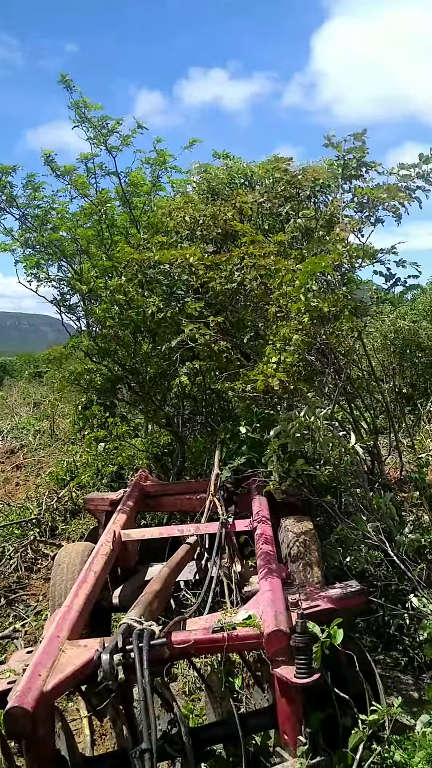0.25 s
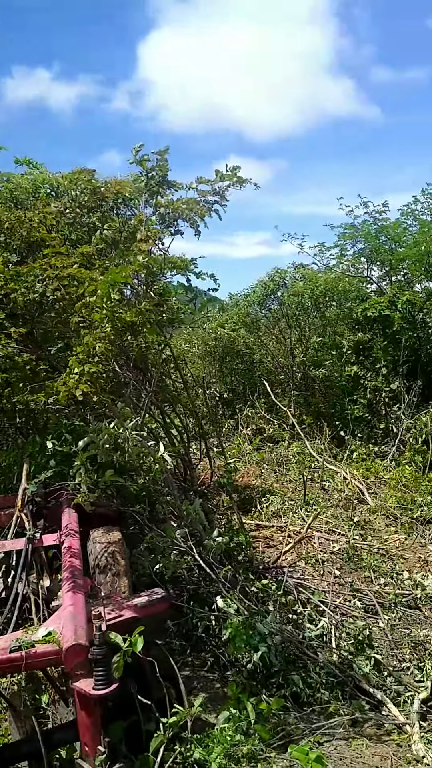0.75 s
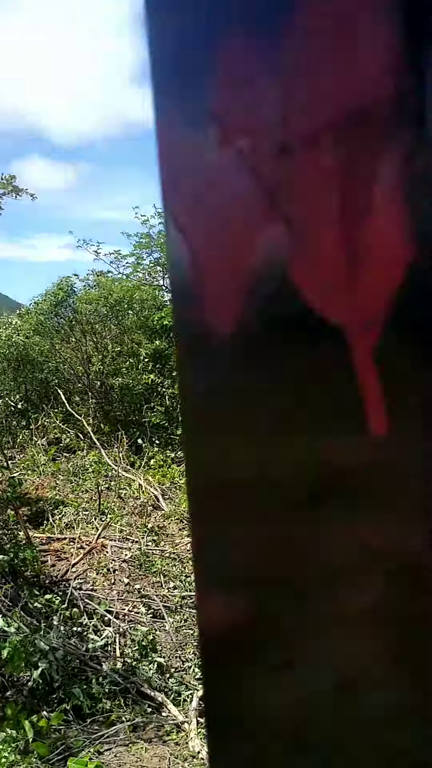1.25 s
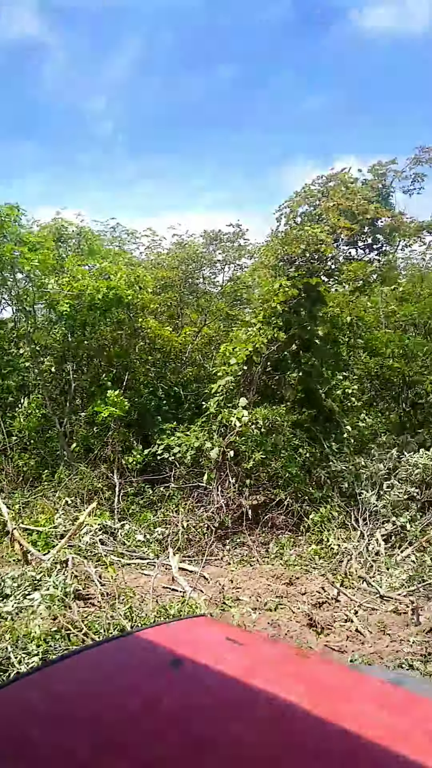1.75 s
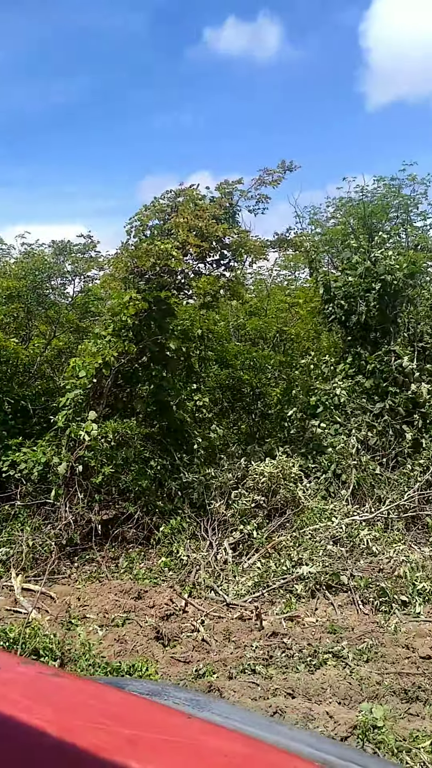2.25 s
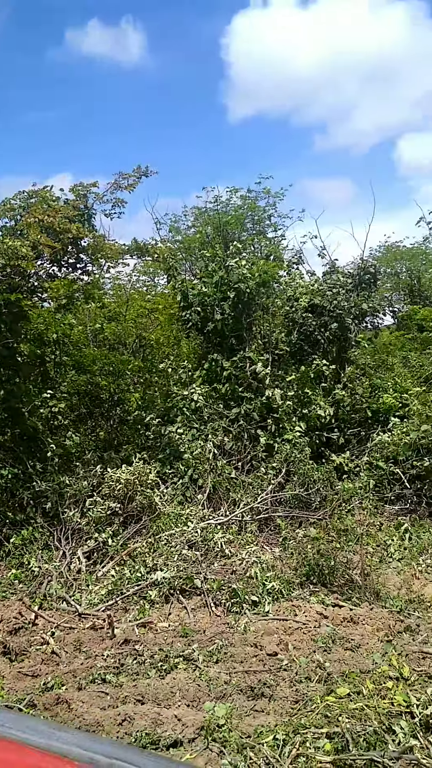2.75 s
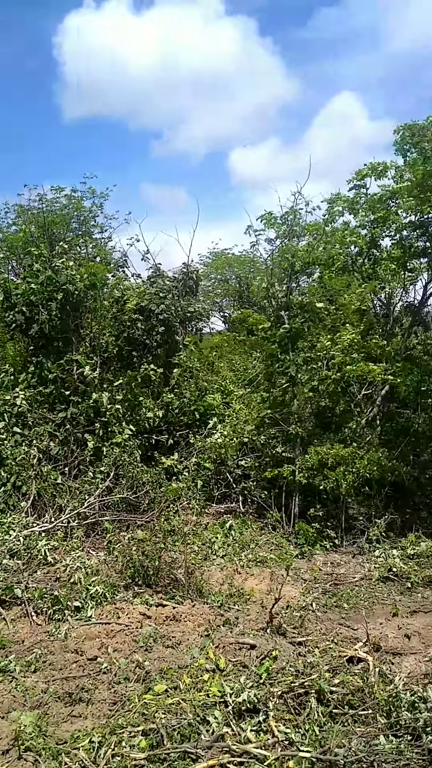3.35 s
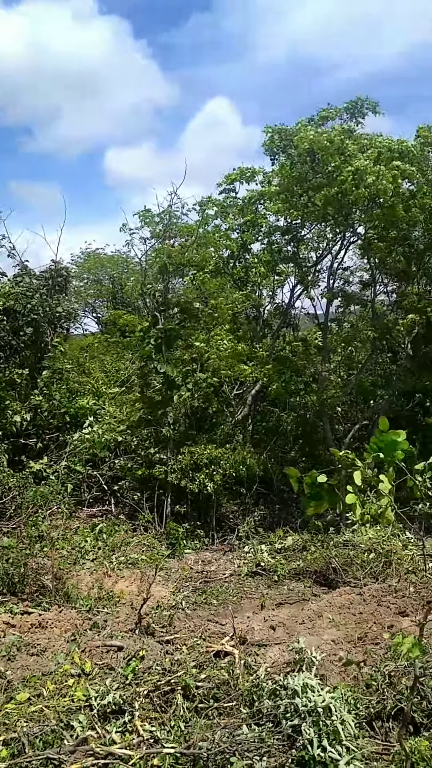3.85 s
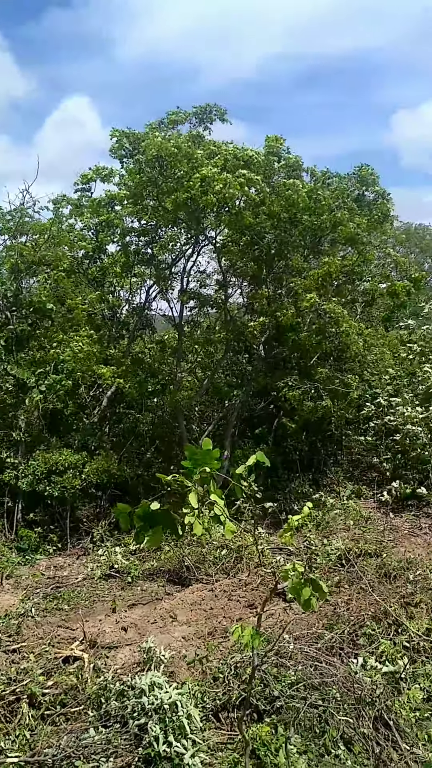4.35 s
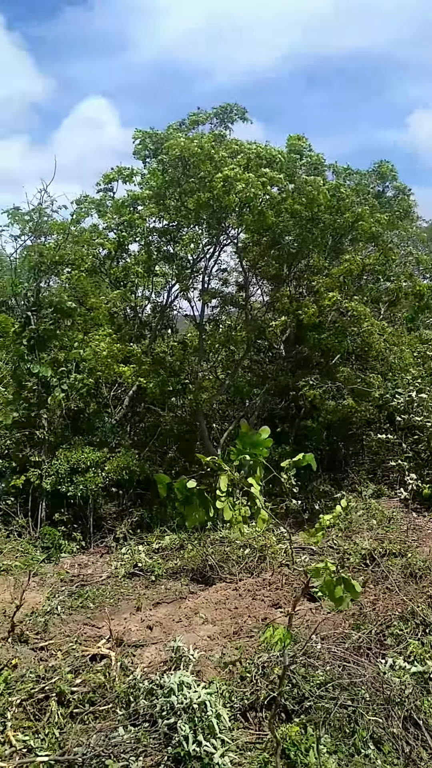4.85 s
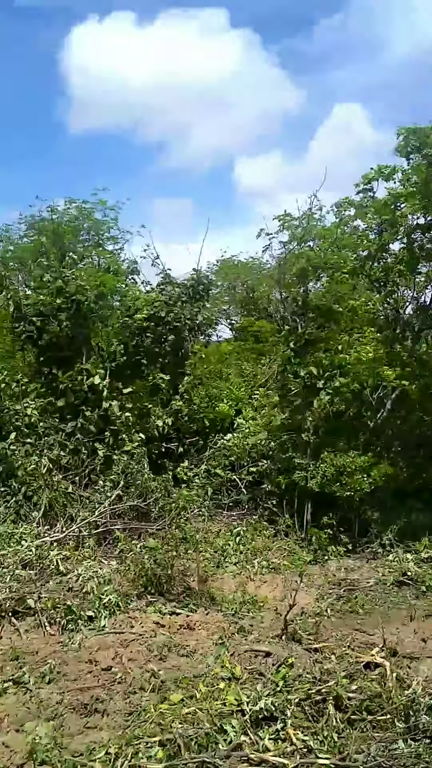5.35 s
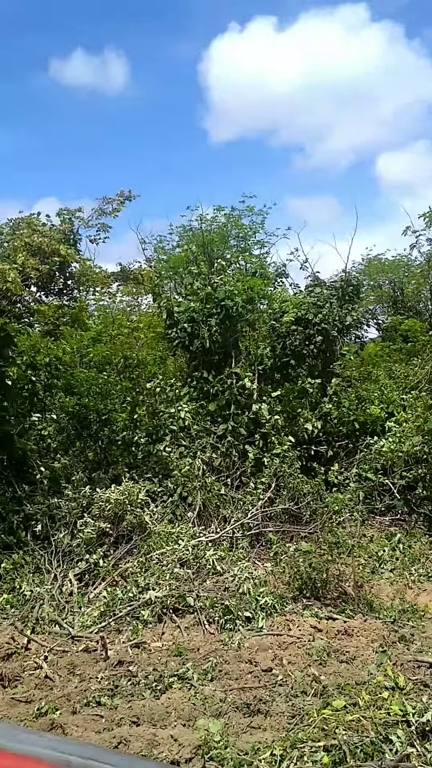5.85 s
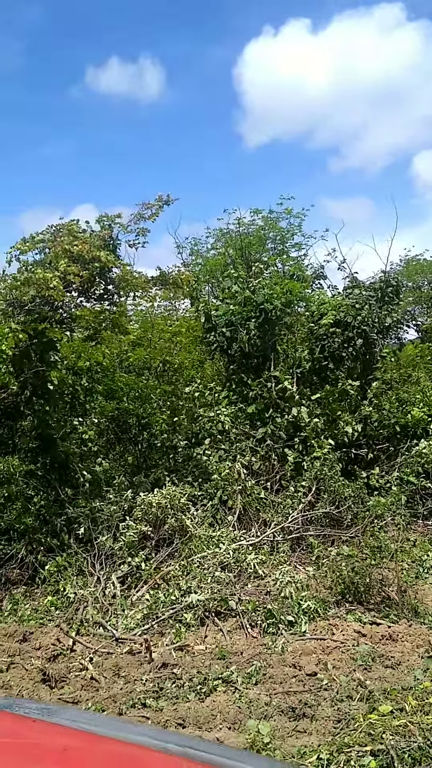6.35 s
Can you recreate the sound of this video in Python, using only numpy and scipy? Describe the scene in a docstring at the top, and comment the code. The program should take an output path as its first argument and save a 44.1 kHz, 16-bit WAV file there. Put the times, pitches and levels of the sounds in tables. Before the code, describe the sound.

A tractor diesel runs at a steady idle for about 6.6 seconds, heard close from the driver's seat outdoors on a hand-held stereo microphone. Its rapid uneven chug combines low exhaust thumps, dense metallic clatter, ringing knocks in the block and thin gear whines, the whine strongest early. From 0.5 s small bright metal ticks and light gusts come and go. From 1 s the right side gradually turns toward the engine, its mid-range knocking becoming clearer, and a booming tone strengthens around 2.4 s. Between 2.6 and 3.6 s wind bursts pop hard, first left, then on both sides, with short hollow rings and low flutter. A very high insect rasp clicks in fast pulses, clearest around 4.3 to 4.8 s. A weaker gust brushes the left near 5.9 s. At 6.4 s everything cuts to silence briefly, then the engine fades partway back until the end.

```python
"""A tractor diesel idles outdoors, heard from the driver's seat by a hand-held pair of microphones.
Throughout, crank-locked tones thump, contacts ring the block, gear tones whine and an insect clicks in noise.
From half a second bright pings and gusts come and go; from 1 s the hand turns the right port to the engine.
Around 2.6 to 3.6 s wind pops burst on the ports, pointed pushes that ring on; a weaker gust returns near 5.9 s.
At 6.4 s the sound is cut, then fades part of the way back in."""
import sys
import numpy as np
from scipy import signal
from scipy.io import wavfile
from scipy.ndimage import uniform_filter1d

SR = 44100
rng = np.random.default_rng(int(sys.argv[2]) if len(sys.argv) > 2 else 0)


def dump(signal):
    """Clip the signal to [-1, 1] and save it as 16-bit WAV at the path in sys.argv[1]."""
    limited = np.clip(np.atleast_2d(signal).T, -1, 1)
    pcm = np.round(limited * 32767).astype(np.int16)
    wavfile.write(sys.argv[1], SR, pcm)


N = 291060

# gusts that catch one port: start_s, hold_s, port (0 left, 1 right), buffet_db, flutter_db
GUST_ROWS = [(0.57, 0.096, 0, -25, -34), (1.475, 0.067, 0, -25, -57), (2.334, 0.16, 0, -25.5, -40),
             (2.655, 0.068, 0, -25, -34), (2.806, 0.04, 0, -25, -33), (2.847, 0.018, 1, -22.5, -40),
             (2.989, 0.016, 1, -20.5, -36), (2.973, 0.031, 0, -22, -44), (3.08, 0.043, 0, -19, -31),
             (3.082, 0.0088, 1, -23, -23), (3.16, 0.21, 1, -21, -26), (3.175, 0.032, 0, -19, -39),
             (3.308, 0.2, 0, -20, -38), (3.435, 0.018, 1, -22, -23.5), (3.585, 0.07, 1, -27, -30.5),
             (3.62, 0.079, 0, -30, -45), (5.89, 0.031, 0, -25, -45), (6.28, 0.032, 0, -28, -50)]
BRIGHT_ABOVE_HZ = 3000  # thin parts: they answer hard firings and vary more in pitch


def from_db(db):
    """Decibels to gain."""
    return 10 ** (np.asarray(db) / 20)


def rms_one(x):
    """Each channel scaled to rms 1."""
    return x / np.sqrt(np.mean(x ** 2, axis=-1, keepdims=True) + 1e-20)


def in_time(rows):
    """Columns of a curve whose first column is seconds, read sample by sample."""
    s, *columns = np.transpose(rows)
    return [np.interp(np.arange(N) / SR, s, column) for column in columns]


def at_hz(points, hz):
    """A spectrum read on a log-frequency axis."""
    point_hz, values = np.transpose(points)
    return np.interp(np.log(hz), np.log(point_hz), values)


def drift(rate_hz):
    """Slow chance of spread 1: noise through a two-pole low-pass, computed every 40 samples."""
    r = np.exp(-2 * np.pi * rate_hz * 40 / SR)
    noise = rng.standard_normal(N // 40 + 2002)
    slow = signal.lfilter([1], [1, -2 * r, r * r], noise)[2000:]  # drop the settling
    return np.interp(np.arange(N) / 40, np.arange(len(slow)), rms_one(slow))


def resonance(x, hz, width_hz):
    """One two-pole resonance."""
    r = np.exp(-np.pi * width_hz / SR)
    return signal.lfilter([1, 0, -1], [1, -2 * r * np.cos(2 * np.pi * hz / SR), r * r], x)


def crank():
    """Crank turns made at every sample: the running sum of its speed."""
    # crankshaft speed: start_s, speed_turns_per_s
    speed = [(0, 18.116), (.7, 18.091), (1.4, 17.892), (2.7, 18.069), (4.1, 18.031), (4.7, 18.135),
             (6.6, 18.002)]
    start_turn = -.413
    return start_turn + np.cumsum(in_time(speed)[0]) / SR


def exhaust(turns, wobble_db, wobble_rad):
    """Whole multiples dip once a turn, every fourth late; halves, from unequal cylinders, once a cycle."""
    # exhaust tones: multiple of crank speed, level_db (rms, before boom and wobble)
    tones = [(2.0, -70.0), (2.5, -57.0), (3.0, -35.0), (3.5, -50.0), (4.0, -35.5), (4.5, -50.0),
             (5.0, -34.5), (5.5, -41.0), (6.0, -34.5), (6.5, -55.0), (7.0, -38.0), (7.5, -40.0),
             (8.0, -40.0), (8.5, -36.0), (9.0, -44.0), (9.5, -49.0), (10.0, -42.0), (10.5, -42.0),
             (11.0, -44.0), (11.5, -47.0), (12.0, -47.0)]
    # the bonnet booms on one half multiple as the hand turns: start_s, boom_db over its exhaust row
    boom = [(0, -19), (2.0, -8), (2.4, 4.5), (3.0, 0), (4.2, 3), (5.6, -1.5), (6.0, 6), (6.42, 5),
            (6.47, -10), (6.6, -8)]
    boom_multiple = 8.5
    boom_db, = in_time(boom)
    out = np.zeros(N)
    for multiple, level_db in tones:
        if multiple % 1:
            dip_turn = 1.77
        elif multiple % 4:
            dip_turn = .96
        else:
            dip_turn = .995
        phase = 2 * np.pi * multiple * (turns - dip_turn)
        phase = phase + wobble_rad * np.sqrt(multiple) * drift(1.85)
        tone_db = level_db + boom_db * (multiple == boom_multiple) + wobble_db * drift(3.1)
        out -= np.sqrt(2) * from_db(tone_db) * np.cos(phase)
    return out


def harder(at, hz):
    """Extra dB for bright contacts that fall on a firing harder or softer than usual."""
    # marked firings: start_s, tick_peak_db (only its distance from the usual tick counts)
    firings = [(0.5661, -38.5), (1.6247, -39), (1.6781, -39), (1.736, -37), (1.7903, -39.5),
               (1.8472, -39.5), (1.9589, -38), (2.0143, -37.5), (2.1211, -40), (2.8464, -39), (3.1218, -38),
               (3.3428, -39), (3.6735, -41.5), (4.1165, -39.5), (4.559, -40.5), (4.8918, -39),
               (5.1123, -39.5), (5.9983, -40), (6.332, -39.5)]
    usual_tick_db, reach_s = -40, .014
    s, peak_db = np.transpose(firings)
    near = np.abs(np.asarray(at)[..., None] / SR - s) < reach_s
    return (near * (peak_db - usual_tick_db)).sum(axis=-1) * (hz > BRIGHT_ABOVE_HZ)


def strokes(turns, attack_s, decay_s, treble_shortening):
    """Returns the loudness envelope, for any pitch, of contacts repeated every two-turn cycle."""
    # contacts: turn in the cycle, centre_hz, reach_octaves, force_db before smoothing and scatter
    contacts = [(0.806, 9300, 1.95, 11.5), (1.765, 13500, 2.32, 14), (1.33, 4200, 0.89, 3.5),
                (0.597, 350, 1.38, 7), (1.274, 250, 1.16, 6), (1.443, 580, 1.02, 6.5),
                (0.8, 15000, 0.3, 10), (0.75, 4100, 0.2, 7), (1.83, 2570, 0.47, 8), (0.087, 9300, 1.15, 2),
                (2.07, 230, 0.27, 5)]
    scatter_db, band_scatter_db, jitter_turns = 0.8, 1.8, .014
    turn, centre_hz, reach, level_db = np.transpose(contacts)
    cycles = 2 * np.arange(-1, turns[-1] // 2 + 1)[:, None]
    jitter = jitter_turns * rng.standard_normal((len(cycles), len(turn)))
    at = np.searchsorted(turns, cycles + turn + jitter)
    inside = (at > 0) & (at < N)
    force_db = level_db + harder(at, centre_hz) + scatter_db * rng.standard_normal(at.shape)

    def envelope(hz):
        """Contact power smoothed by an attack and a decay, over a steady floor."""
        # thin parts die sooner: times hold at 2 kHz and shorten with pitch
        times_s = np.array([attack_s, decay_s]) * (hz / 2000) ** -treble_shortening
        rise, fall = np.exp(-1 / (times_s * SR))
        share = np.exp(-.5 * (np.log2(hz / centre_hz) / reach) ** 2)
        band_db = force_db + band_scatter_db * rng.standard_normal(at.shape)
        power = share * from_db(band_db) ** 2
        clicks = np.full(N, 1e-12)
        np.add.at(clicks, at[inside], power[inside])
        smooth = signal.lfilter([1 - rise], np.convolve([1, -rise], [1, -fall]), clicks)
        return rms_one(np.sqrt(1 + smooth))
    return envelope


def facing(hz, facing_db):
    """Gain at the right port as the hand turns: the middle pitches change most."""
    return from_db(facing_db * np.exp(-.5 * (np.log2(hz / 1800) / 0.63) ** 2))


def grit(per_s, spread_db):
    """Dense small impacts of uneven size, two unrelated streams."""
    uneven_db = spread_db * np.minimum(rng.exponential(1, (2, N)), 4)
    sizes = from_db(uneven_db) * rng.choice([-1, 1], (2, N))
    return rms_one(sizes * (rng.random((2, N)) < per_s / SR))


def clatter(envelope, facing_db, patchy_db):
    """Third-octave bands of impacts, each swelling with the contacts that reach it."""
    # clatter at the left port: pitch_hz, density_db (per Hz, before the overall level)
    left_colour = [(45, -9.5), (150, -0.5), (210, -8), (280, -9), (500, -15.5), (800, -14), (1150, -19),
                   (1750, -20), (2300, -27), (3600, -33.5), (5500, -46.5), (8800, -61.5), (10500, -56),
                   (12000, -56), (15500, -59)]
    # clatter at the right port: pitch_hz, density_db (per Hz, before facing and the overall level)
    right_colour = [(45, -12), (150, -2), (210, -7.5), (280, -7.5), (500, -14), (800, -11), (1150, -14.5),
                    (1750, -8), (2300, -19.5), (3600, -29), (5500, -36), (8800, -56), (10500, -41),
                    (12000, -46.5), (15500, -52)]
    # how alike the ports hear it: pitch_hz, correlation (0 to 1)
    likeness = [(60, 1), (180, 0.93), (550, 0.76), (1200, 0.57), (2200, 0.087), (4000, 0.17), (15000, .05)]
    overall_db = -48
    out = np.zeros((2, N))
    edges = 40 * 2 ** np.arange(0, 9.1, 1 / 3)
    # neighbouring bands take unrelated streams
    streams = [grit(per_s=12000, spread_db=3.5), grit(per_s=12000, spread_db=4.5)]
    for k, (low, high) in enumerate(zip(edges, edges[1:])):
        hz = np.sqrt(low * high)
        shaken = envelope(hz) * from_db(patchy_db * drift(6.9)) * streams[k % 2]
        band = signal.butter(3, [low, high], "band", fs=SR, output="sos")
        mid, side = signal.sosfilt(band, shaken)
        alike = np.clip(at_hz(likeness, hz), -1, 1)
        common, apart = np.sqrt(1 + alike) * mid, np.sqrt(1 - alike) * side
        out[0] += from_db(at_hz(left_colour, hz)) * (common + apart)
        out[1] += from_db(at_hz(right_colour, hz)) * facing(hz, facing_db) * (common - apart)
    return from_db(overall_db) * np.sqrt(SR / 4) * out


def block(envelope, facing_db, shared):
    """The same contacts knock the castings, which ring on; both ports hear part of the same ring."""
    # block and bonnet resonances: pitch_hz, width_hz, left_db, right_db (rms, right before facing)
    castings = [(652, 86, -40.5, -41), (795, 20, -57, -48), (1040, 130, -64, -70), (1165, 13.5, -49, -43),
                (1390.6, 37, -47, -36.5), (1516, 92, -61, -36), (1747, 78, -65, -33.5),
                (1790, 37, -67, -50.5), (2046, 18, -51, -41), (3700, 400, -62, -47), (4900, 2900, -81, -50)]
    out = np.zeros((2, N))
    own, common = grit(per_s=4000, spread_db=1.0)
    left_blows = shared * common + np.sqrt(1 - min(shared, 1) ** 2) * own
    blows = np.array([left_blows, common])
    for hz, width_hz, left_db, right_db in castings:
        ring = resonance(envelope(hz) ** 1.48 * blows, hz, width_hz)
        # a second, wider pass keeps the skirts steep
        left, right = rms_one(resonance(ring, hz, 3.7 * width_hz))
        out[0] += from_db(left_db) * left
        out[1] += from_db(right_db) * facing(hz, facing_db) * right
    return out


def knocks(turns, facing_db):
    """Single knocks swell and die within a few cycles of their pitch, a little different every time."""
    # knocks in each two-turn cycle, each with its own pitch and width; some pitches come twice:
    # turn, pitch_hz, width_hz, left_db, right_db (peaks, before scatter, hard firings and facing)
    knock_rows = [(1.7, 800, 80, -26, -27), (1.16, 1600, 200, -36, -28), (.9, 660, 110, -30, -29),
                  (1.03, 390, 70, -33, -34), (.06, 1750, 200, -40, -24), (1.07, 1750, 200, -43, -28),
                  (1.06, 1180, 150, -37, -35), (1.83, 2050, 200, -39, -30), (1.84, 1400, 200, -40, -34),
                  (.14, 540, 90, -35, -34), (.86, 3900, 350, -42, -36), (1.85, 3300, 450, -42, -35),
                  (.875, 6500, 1500, -53, -43), (1.87, 7000, 1500, -51, -42), (.88, 12500, 2500, -59, -48),
                  (1.875, 12500, 2500, -56, -46)]
    scatter_db, jitter_turns = 1.6, .008
    out, t = np.zeros((2, N + 1500)), np.arange(1500) / SR
    for cycle in np.arange(0, turns[-1] - 2, 2):
        for turn, hz, width_hz, left_db, right_db in knock_rows:
            late, detune, force = rng.standard_normal(3)
            at = np.searchsorted(turns, cycle + turn + jitter_turns * late)
            age = np.pi * width_hz * t
            detune_spread = .09 if hz > BRIGHT_ABOVE_HZ else .02  # fraction of the pitch
            tone = np.sin(2 * np.pi * hz * (1 + detune_spread * detune) * t)
            ring = age * np.exp(1 - age) * tone
            ports = from_db([[left_db], [right_db]]) * [[1], [facing(hz, facing_db[at])]]
            out[:, at:at + len(t)] += from_db(scatter_db * force + harder(at, hz)) * ports * ring
    return out[:, :N]


def whine(turns):
    """Two thin gear tones, each a whole number of teeth a crank turn."""
    # gear whines: start_s, low_db, high_db (rms, before drift)
    levels = [(0, -39.5, -41.5), (.55, -42.5, -34), (.75, -41, -54), (1.6, -40.5, -41), (3.1, -52, -51),
              (3.6, -55, -41.5), (5.0, -49.5, -46.5), (6.6, -43, -43)]
    out = np.zeros(N)
    for teeth, level_db in zip((21, 43), in_time(levels)):
        gain = np.sqrt(2) * from_db(level_db + 2.7 * drift(7.4))
        out += gain * np.sin(2 * np.pi * teeth * turns + 0.76 * drift(3.5))
    return out


def pings():
    """Loose thin metal ticks and rings for a moment, mostly at the right port."""
    # pings: start_s, peak_db (before attack and port gain), pitch_hz
    ticks = [(0.5676, -40, 11700), (1.6791, -40, 14000), (1.8462, -41, 11300), (1.9584, -44, 11700),
             (2.0148, -42, 11400), (2.0697, -40, 11400), (2.1206, -36, 11700), (2.4573, -39, 11200),
             (3.2889, -43, 11600), (3.6735, -46, 13900), (4.1155, -38, 13000), (5.5024, -49, 11500),
             (5.9449, -41, 11200), (6.3305, -46, 11700)]
    t60_s, attack_s, port_db = .009, .00051, [[-11], [5]]
    out, t = np.zeros(N), np.arange(2000) / SR
    for s, level_db, hz in ticks:
        decay = from_db(level_db - 60 * t / t60_s)
        ring = decay * np.sin(2 * np.pi * hz * t) * np.minimum(t / attack_s, 1)
        start = round(s * SR)
        out[start:start + len(t)] += ring
    return from_db(port_db) * out


def pops():
    """Eddies burst on one port as pointed pushes with a slower dip after; the port rings on a little."""
    # wind pops: start_s (of the peak), peak_db (before ring and low cut), width_ms, port (0 left, 1 right)
    bursts = [(2.640, -13, .5, 0), (2.6615, -4, 1.1, 0), (2.677, -9, 0.4, 0), (2.680, -14, .4, 0),
              (2.687, -8, .4, 0), (2.709, -5, 1.4, 0), (2.7215, -4.5, 0.8, 0), (2.781, -10, 1.2, 0),
              (2.811, -14, .6, 0), (2.822, -8, 0.5, 0), (2.8345, -9, 0.7, 0), (2.8375, -8, 0.9, 0),
              (2.844, -11, .6, 0), (3.116, -12, 0.72, 0), (3.167, -15, 0.98, 0), (3.208, -13, 1.4, 0),
              (3.232, -9.5, 1.1, 1), (3.284, -11.5, 1.2, 1), (3.356, -12, 0.61, 1), (3.415, -15, 1.1, 0),
              (3.447, -19, .9, 0), (3.495, -16, 1.1, 0), (3.608, -12, 1.6, 0)]
    ring_hz, ring_width_hz, ring_db = 655, 88, 5.5
    out, ms = np.zeros((2, N)), np.arange(N) / SR * 1000
    for s, peak_db, width_ms, port in bursts:
        u = (ms - s * 1000) / width_ms
        push = np.exp(-np.abs(u) ** 1.5)
        dip = .28 * np.exp(-((u - 3.0) / 1.8) ** 2)
        out[int(port)] += from_db(peak_db) * (push - dip)
    ring = np.pi * ring_width_hz / SR * resonance(out, ring_hz, ring_width_hz)
    return out + from_db(ring_db) * ring


def gusts(breeze_db, peaks_db, edge_db_per_s):
    """Level at each port: a gust climbs out of the breeze, holds and sinks back."""
    level_db, t = np.array(breeze_db), np.arange(N) / SR
    for (s, hold_s, port, *_), peak_db in zip(GUST_ROWS, peaks_db):
        outside_s = np.maximum(np.maximum(s - t, t - s - hold_s), 0)
        side = int(port)
        level_db[side] = np.maximum(level_db[side], peak_db - edge_db_per_s * outside_s)
    return level_db


def buffeting(level_db, low_hz, high_hz, even_s):
    """Band noise, its own at each port, evened over a short time so that it follows each gust."""
    band = signal.butter(2, [low_hz, high_hz], "band", fs=SR, output="sos")
    air = signal.sosfilt(band, rng.standard_normal((2, N)))
    local_rms = np.sqrt(uniform_filter1d(air ** 2, size=int(even_s * SR), axis=1) + 1e-12)
    return from_db(level_db) * air / local_rms


def wind():
    """Low buffeting, and a higher flutter on top of it."""
    # breeze under the gusts: start_s, left_db, right_db (buffeting before the low cut)
    breeze = [(0, -30, -36), (1.9, -35, -45), (2.4, -34, -28), (3.7, -32.5, -43), (4.5, -42, -63),
              (6.6, -63, -29)]
    flutter_under_db = -15.5  # breeze flutter relative to its buffeting
    breeze_db = np.array(in_time(breeze))
    *_, buffet_db, flutter_db = np.transpose(GUST_ROWS)
    buffet_level = gusts(breeze_db, buffet_db, edge_db_per_s=252)
    flutter_level = gusts(breeze_db + flutter_under_db, flutter_db, edge_db_per_s=700)
    low = buffeting(buffet_level, low_hz=49.0, high_hz=148, even_s=0.104)
    return low + buffeting(flutter_level, low_hz=162, high_hz=470, even_s=0.052)


def insect():
    """Runs of sharp noise clicks with short rests over a faint hiss, in a bright band; the song swells."""
    # an insect in the brush: start_s, level_db at the right port
    song = [(0, -66), (.9, -60), (1.5, -57), (2.0, -56), (2.4, -59), (2.9, -62), (3.3, -56.5), (3.7, -62),
            (4.3, -54.5), (4.8, -55), (5.2, -62), (5.5, -59), (5.9, -61), (6.6, -74)]
    pitch_hz, width_hz, left_db = 10450, 1900, -15.5  # left relative to right
    throbs_per_s, slots_a_throb, clicks_a_throb = 38.4, 7, 4
    click_s, scatter_db, between_db = .0007, 2.0, -13
    slots_per_s = slots_a_throb * throbs_per_s
    slots = slots_per_s * np.arange(N) / SR - .4 + .15 * drift(1.2)
    slot = np.floor(slots).astype(int)
    sizes = from_db(scatter_db * rng.standard_normal(slot.max() + 2))[slot]
    sizes = sizes * (slot % slots_a_throb < clicks_a_throb)
    age_s = (slots - slot) / slots_per_s
    strength = sizes * np.exp(-age_s / click_s) + from_db(between_db)
    clicks = strength * rng.standard_normal((2, N))
    band = resonance(resonance(clicks, pitch_hz, width_hz), pitch_hz, width_hz)
    return from_db(in_time(song)[0] + np.array([[left_db], [0]])) * rms_one(band)


def scene():
    """Engine, insect and wind at the two ports; engine sound reaches the right port a little later."""
    # the hand: start_s, facing_db (right port toward the engine)
    hand = [(0, -3.5), (1.0, -3.5), (2.4, 0.5), (3.4, 2.5), (5.2, 3), (5.7, 1.5), (6.6, 0)]
    right_lag_samples = 12
    turns = crank()
    facing_db, = in_time(hand)
    envelope = strokes(turns, attack_s=0.0072, decay_s=0.0045, treble_shortening=0.092)
    rattle = clatter(envelope, facing_db, patchy_db=0.07)
    rattle = rattle + block(envelope, facing_db, shared=0.32) + knocks(turns, facing_db)
    # small ports pass little deep rumble
    rumble_cut = signal.butter(3, 50, "high", fs=SR, output="sos")
    tones = exhaust(turns, wobble_db=0.47, wobble_rad=0.11) + whine(turns)
    engine = tones + signal.sosfilt(rumble_cut, rattle)
    engine[1] = np.roll(engine[1], right_lag_samples)
    return engine + insect() + pings() + signal.sosfilt(rumble_cut, wind() + pops())


def record(dry):
    """Silence after the cut, a partial fade-in, and a steep low-pass that removes the top treble."""
    cut_s, fade_from_s, fade_gain_per_s, fade_curve = 6.417, 6.471, 1.36, 0.59
    cutoff_hz = 15740
    t = np.arange(N) / SR
    fade = np.clip(fade_gain_per_s * (t - fade_from_s), 0, 1) ** fade_curve
    gain = np.where(t < cut_s, 1, fade)
    steep = signal.ellip(12, .5, 60, cutoff_hz, fs=SR, output="sos")
    return signal.sosfilt(steep, dry * gain)


dry = scene()
out = record(dry)
dump(out)
```